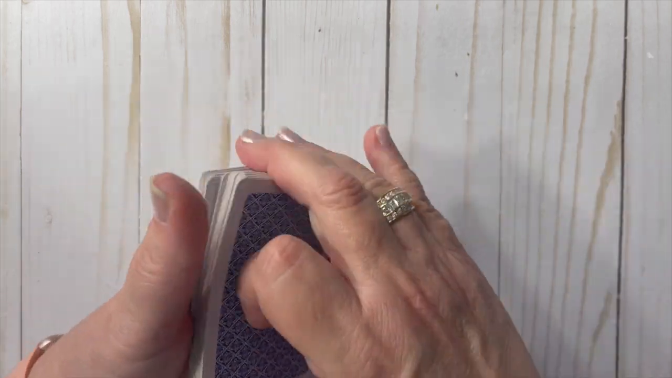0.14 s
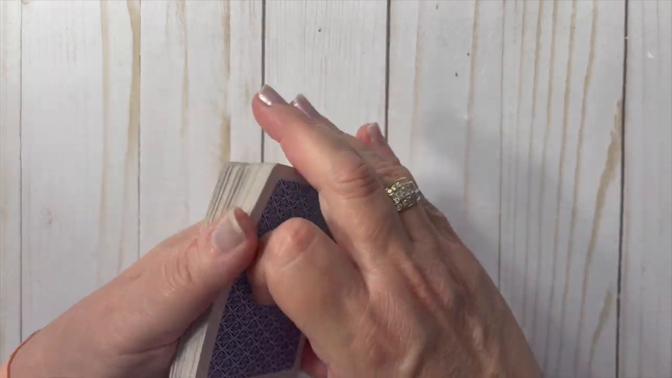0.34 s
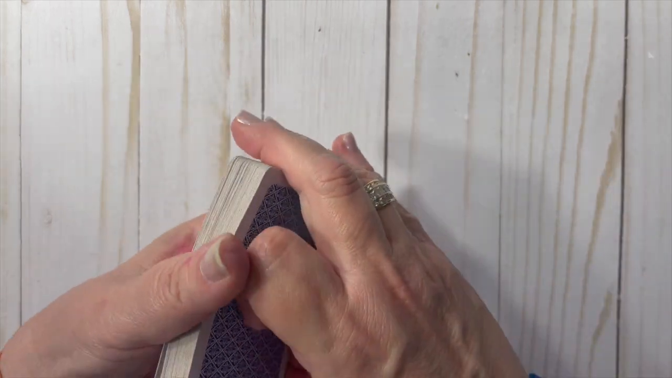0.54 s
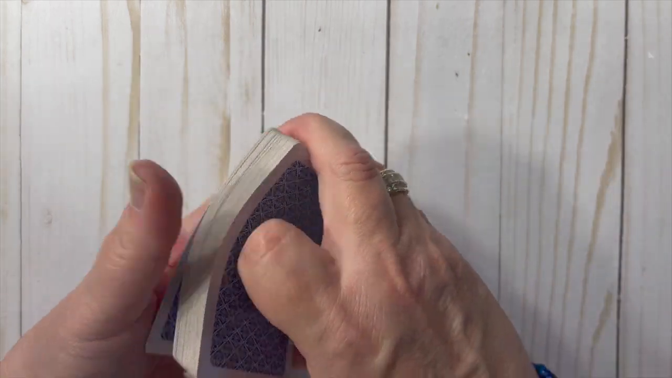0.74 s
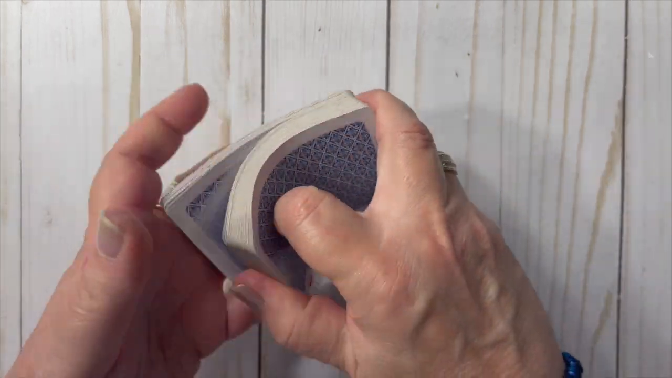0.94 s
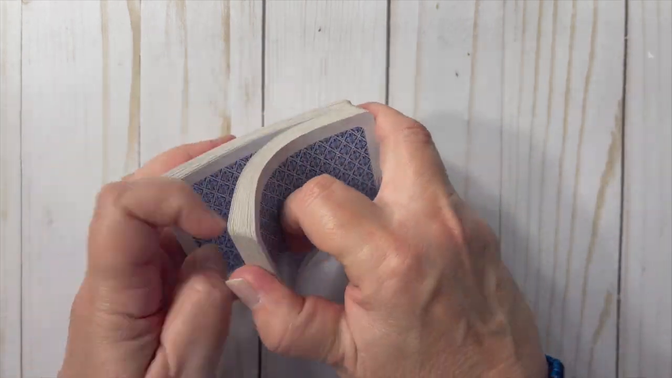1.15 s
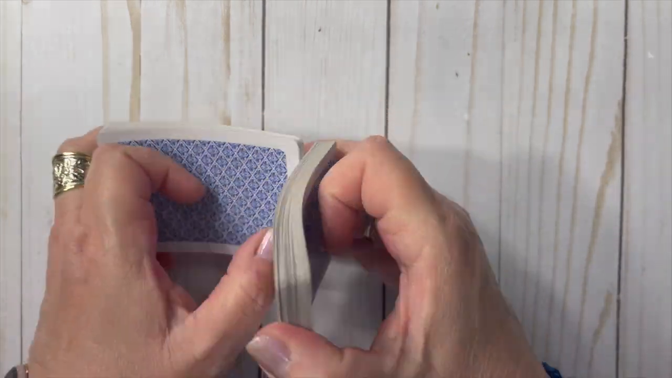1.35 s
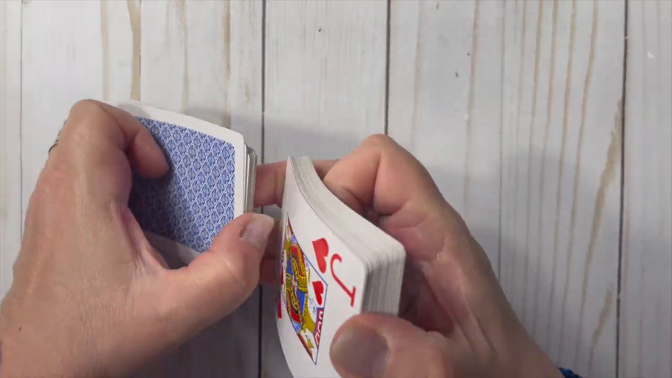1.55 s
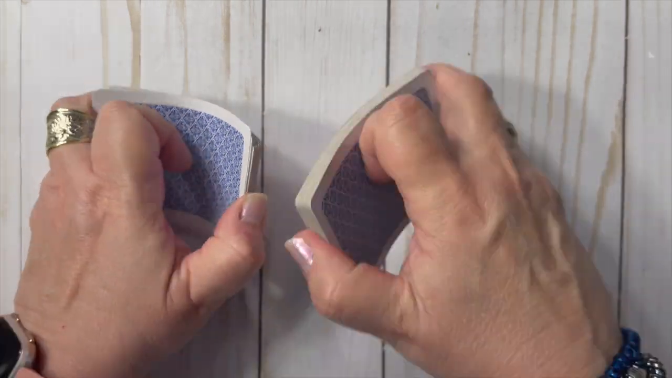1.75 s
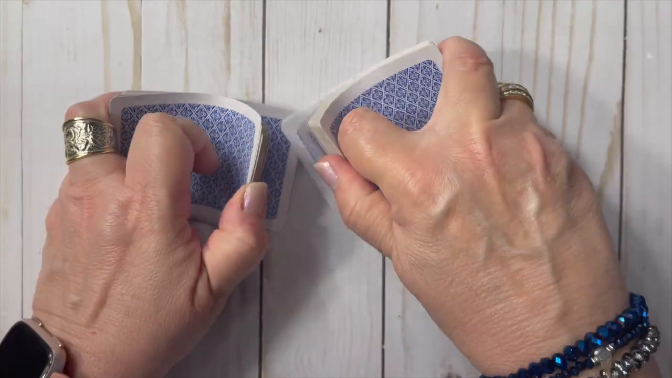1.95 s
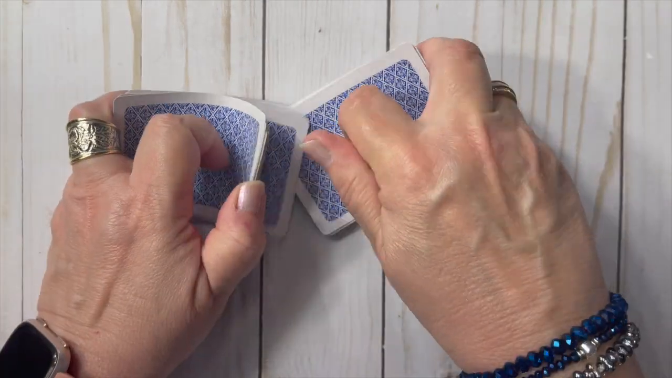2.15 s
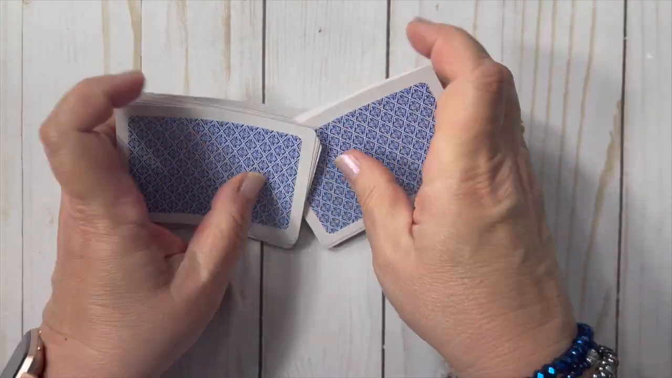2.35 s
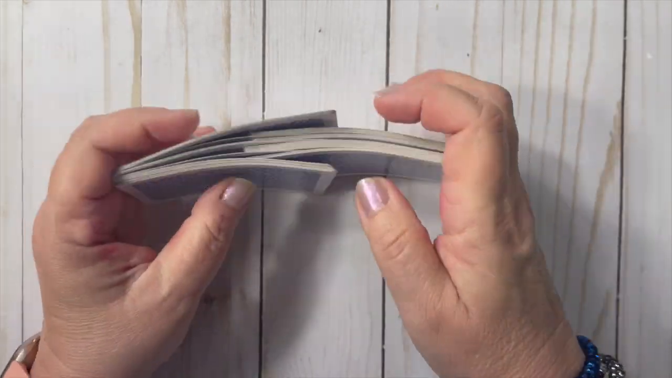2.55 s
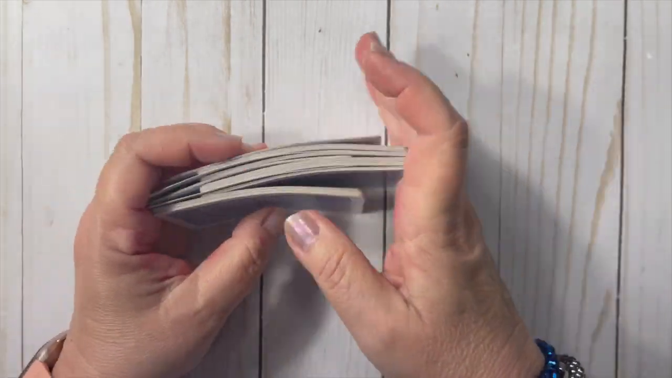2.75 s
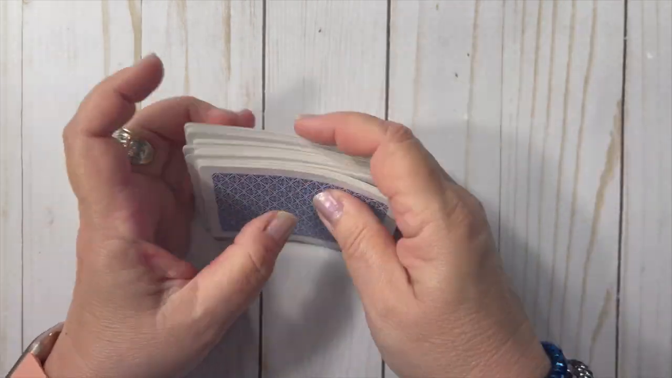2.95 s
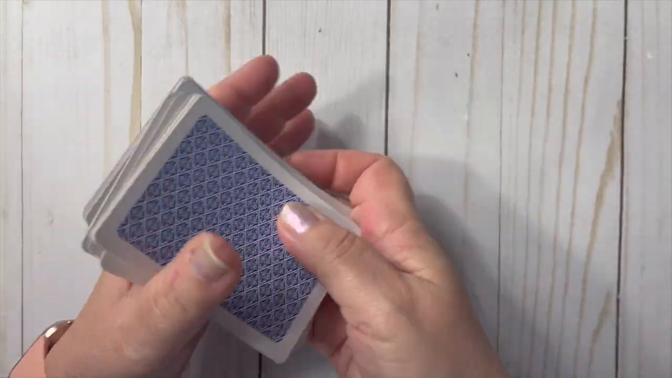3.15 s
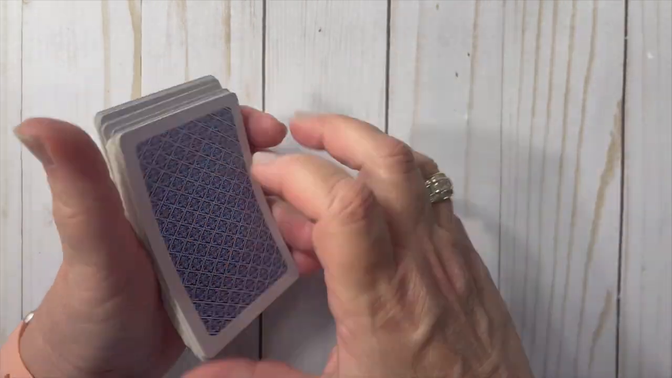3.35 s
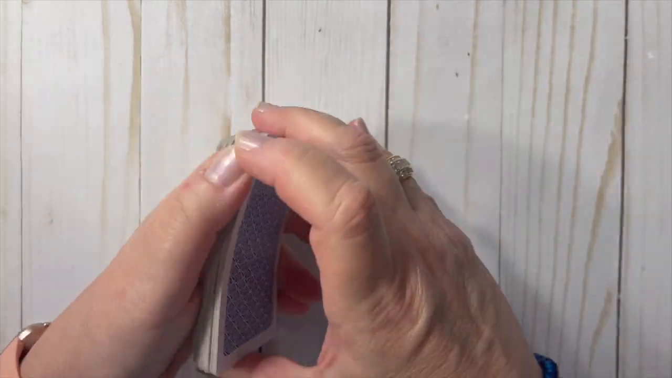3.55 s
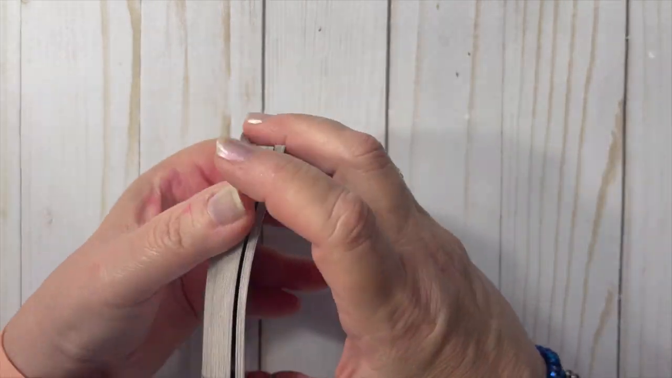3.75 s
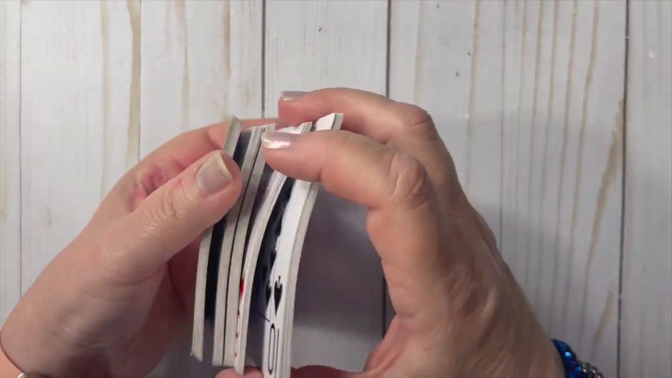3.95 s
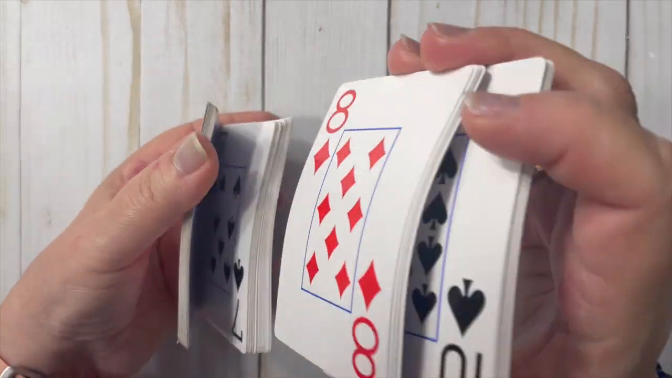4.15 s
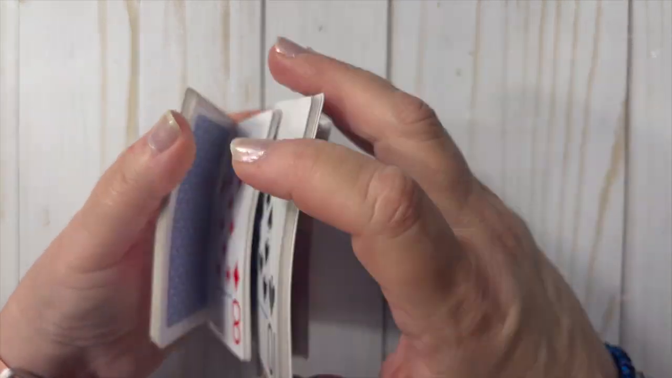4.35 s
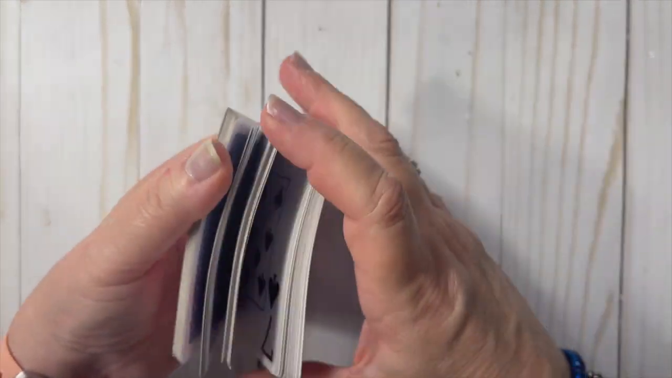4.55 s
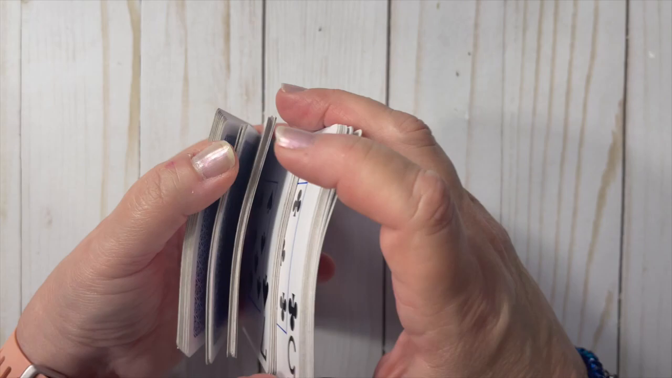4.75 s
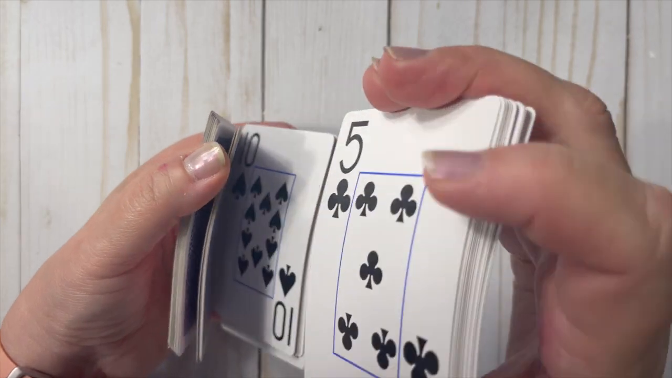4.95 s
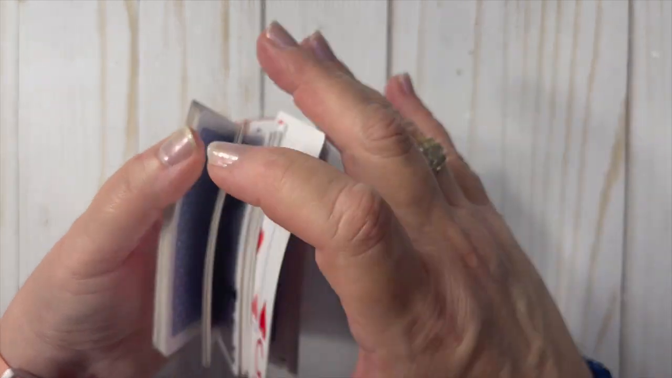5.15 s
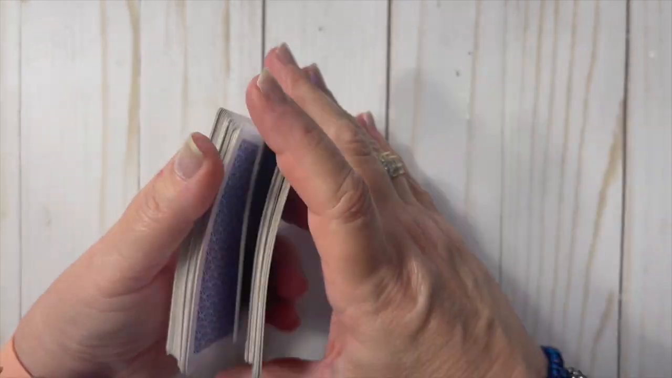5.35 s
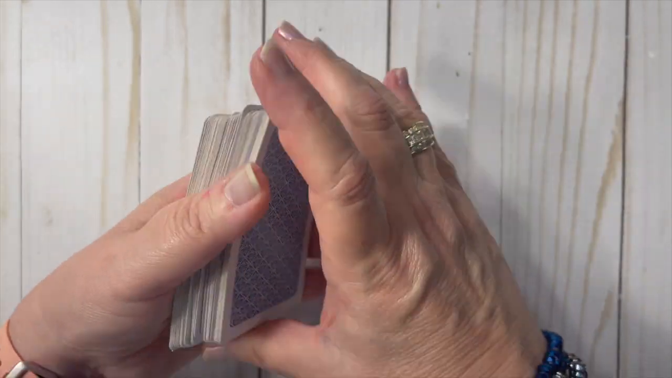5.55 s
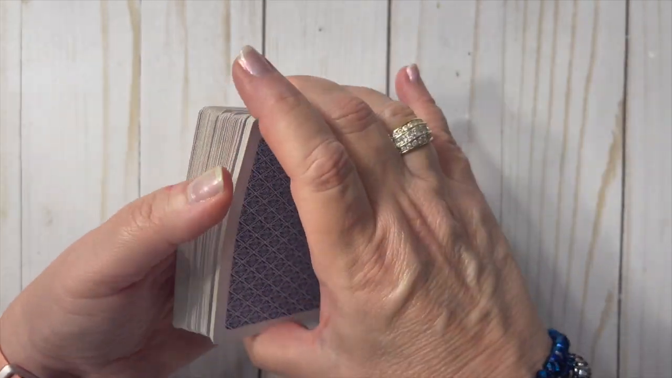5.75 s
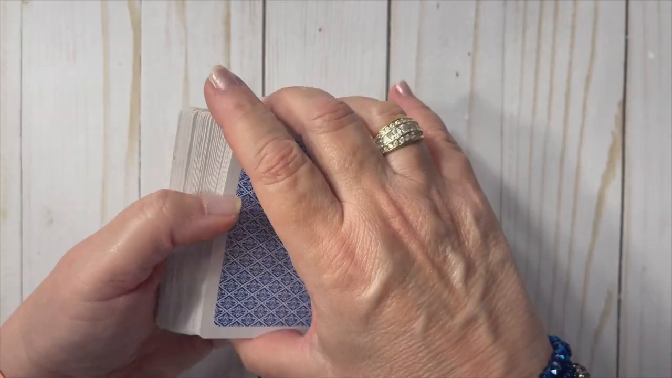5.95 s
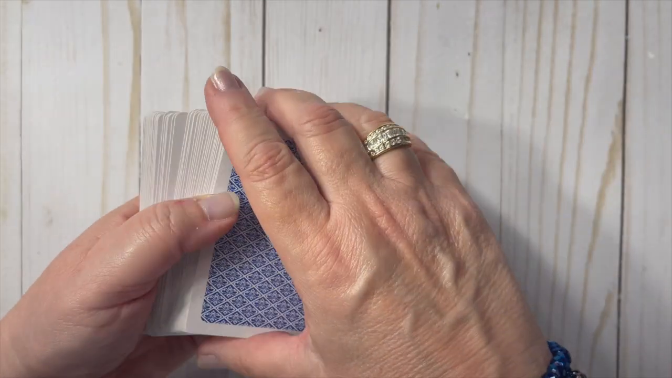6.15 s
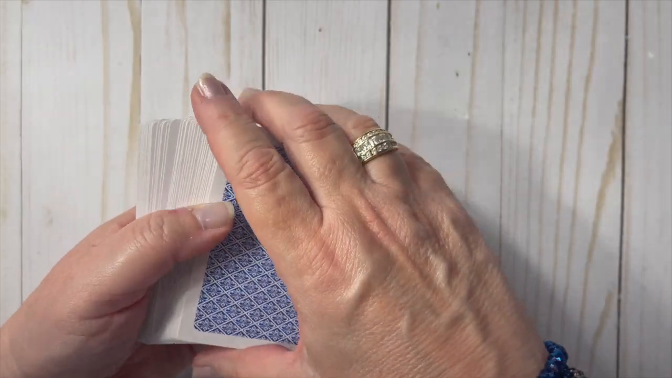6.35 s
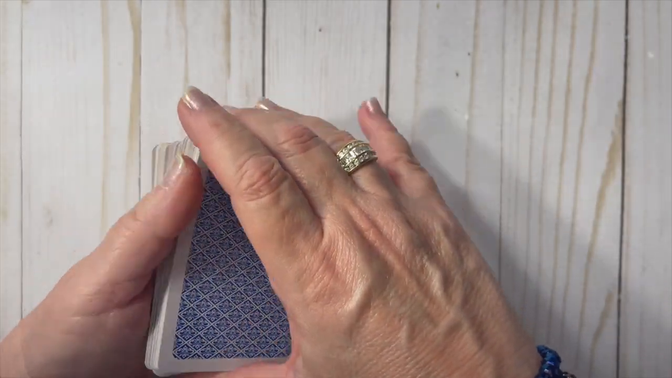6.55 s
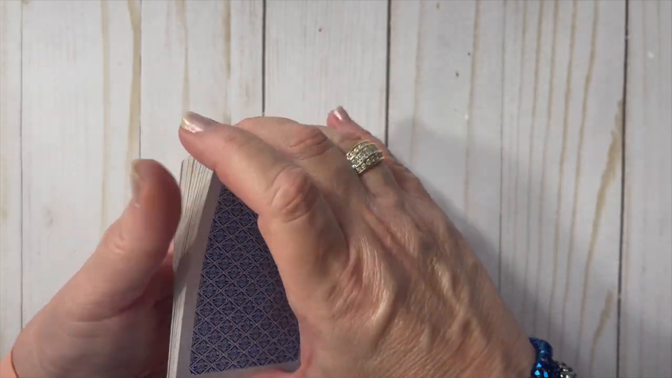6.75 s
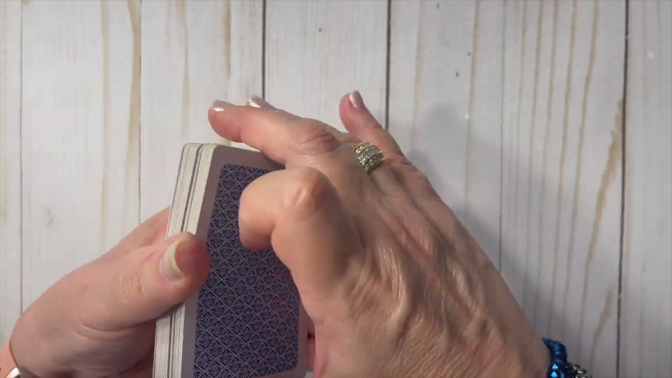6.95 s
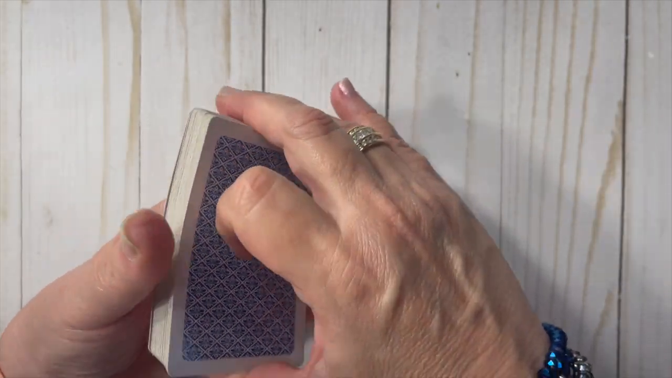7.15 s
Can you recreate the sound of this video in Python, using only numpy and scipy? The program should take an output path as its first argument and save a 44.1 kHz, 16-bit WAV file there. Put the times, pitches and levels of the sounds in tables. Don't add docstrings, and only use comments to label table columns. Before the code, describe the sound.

Crisp card shuffle: faint handling, a rapid rising riffle, loud snaps and a hollow knock, then two sharp cuts and soft finger rustles.

```python
import sys
import numpy as np
from scipy import signal
from scipy.fft import rfft, irfft, next_fast_len
from scipy.io import wavfile
from scipy.ndimage import uniform_filter1d

SR = 44100
rng = np.random.default_rng(int(sys.argv[2]) if len(sys.argv) > 2 else 0)


def gain_from_db(level_db):
    decades = np.asarray(level_db, float) / 20
    return 10 ** decades


def wav_out(sig):
    wavfile.write(sys.argv[1], SR, np.round(np.clip(np.atleast_2d(sig).T, -1, 1) * 32767).astype(np.int16))


N = 317961

# frequency_hz, level_db
EDGE_SPECTRUM = [(1000, -55), (3000, -15.5), (5000, -8.5), (7000, -8.5), (9000, -5.5), (10800, -1),
                 (11800, -9), (13000, -19.5), (14500, -28), (16500, -49.5)]
# frequency_hz, level_db
SLAP_SPECTRUM = [(200, -24.5), (500, -5), (1000, -2), (3000, -6.5), (5000, -7), (8000, -22), (12000, -33.5),
                 (16000, -66.5)]


def evened(x):
    return x / np.sqrt(np.mean(x ** 2) + 1e-20)


def read(points, hz):
    f, value = np.transpose(points)
    return np.interp(np.log(hz + 1), np.log(f + 1), value)


def add(mix, s, sound):
    part = mix[round(s * SR):][:len(sound)]
    part += sound[:len(part)]


def colour(x, points):
    log_gain = read(points, abs(np.fft.fftfreq(2048, 1 / SR))) * np.log(10) / 20
    taps = np.fft.ifft(np.exp(np.conj(signal.hilbert(log_gain)))).real[:1024]
    return signal.oaconvolve(x, taps / np.linalg.norm(taps))[:len(x)]


def resonate(x, hz, width):
    r = np.exp(-np.pi * width / SR)
    turn = 2 * np.pi * hz / SR
    gain = np.sqrt(2 * (1 - r * r)) * np.sin(turn)
    return signal.lfilter([gain], [1, -2 * r * np.cos(turn), r * r], x)


def ringing(x, hz, width):
    return evened(resonate(resonate(x, hz, width), hz, width))


def grit(shape, size, depth_db):
    return evened(gain_from_db(depth_db * evened(uniform_filter1d(rng.standard_normal(shape), size))))


def burst(noise, shape, db):
    x = noise * shape
    return gain_from_db(db) * x / np.sqrt(np.max(uniform_filter1d(x ** 2, size=110)))


def background():
    # frequency_hz, level_db
    rumble_spectrum = [(12, -50.5), (26, -25), (40, -6), (75, 1.5), (103, -10), (155, -5), (174, -18.5),
                       (215, -23.5), (307, -31), (344, -33), (426, -52), (600, -58.5), (780, -83.5),
                       (1320, -120)]
    # frequency_hz, width_hz, level_db
    machines = [(69.6, 8.56, -64), (152, 6, -70.5)]
    # frequency_hz, level_db
    floor_spectrum = [(300, -1), (900, -13), (1800, -11), (3100, -9.5), (3800, -2.5), (4600, -12),
                      (11000, -21), (13000, -25.5), (16000, -29)]
    noise = rng.standard_normal((6, N))
    hz = np.fft.rfftfreq(N, 1 / SR)
    low = evened(irfft(rfft(noise[:2]) * gain_from_db(read(rumble_spectrum, hz)), N))
    rumble = gain_from_db(-59) * (low[0] + 0.07 * low[1] * np.array([[1], [-1]]))
    hums = sum(gain_from_db(db) * resonate(n, f, w) for (f, w, db), n in zip(machines, noise[2:4]))
    hiss = gain_from_db(-74.5) * np.array([colour(n, floor_spectrum) for n in noise[4:]])
    return rumble + hums + hiss


def room(x):
    # frequency_hz, t60_s
    decay = [(200, 0.25), (600, 0.25), (1200, 0.099), (4000, 0.11), (12000, 0.0069)]
    taps = np.zeros((2, 16000))
    at = np.arange(20, 15900, 20) + rng.integers(0, 20, (2, 794))
    np.put_along_axis(taps, at, rng.choice([-1., 1.], at.shape), 1)
    taps *= 1 + 6 * np.exp(-np.arange(16000) / (.003 * SR))
    hz, t, z = signal.stft(taps, SR, nperseg=128)
    fading = gain_from_db(-60 * t / read(decay, hz)[:, None])
    tail = signal.istft(z * fading, SR, nperseg=128)[1]
    tail[1] = .5 * tail[0] + .87 * tail[1]
    return signal.fftconvolve(x[None], tail / np.linalg.norm(tail[0]), axes=1)[:, :N]


def thuds():
    # start_s, level_db, pitch_hz, t60_s
    landings = [(0.828, -47, 144, 0.35), (1.389, -52, 304, 0.033), (1.931, -36.5, 129.6, 0.21),
                (2.297, -43, 97, 0.12), (3.191, -46, 226.6, 0.06), (0.955, -36.5, 152, 0.18),
                (1.029, -37.5, 85, 0.12), (1.266, -51.5, 281, 0.068), (1.801, -41, 209, 0.35),
                (2.091, -24, 104.9, 0.03), (2.163, -34, 200, 0.024), (2.529, -28, 87.1, 0.18),
                (2.876, -44, 249, 0.19), (4.327, -33.5, 332.5, 0.062), (5.115, -44, 434, 0.06)]
    out, t = np.zeros(N), np.arange(8000) / SR
    for (s, db, hz, t60), puff in zip(landings, rng.standard_normal((len(landings), len(t)))):
        push = np.sin(2 * np.pi * hz * t) + .7 * ringing(puff, 2.4 * hz, 1.8 * hz)
        envelope = gain_from_db(db - 60 * t / t60) * (1 - np.exp(-t / .005))
        add(out, s, envelope * push)
    return signal.lfilter(*signal.butter(2, 45, "high", fs=SR), out)


def strokes(column):
    # peak_s, rubbing_db, edge_hiss_db, rise_s, fall_s
    gripping = [(.001, -78, -57.5, .01, 0.012), (0.119, -69.5, -56, 0.086, 0.057),
                (0.241, -62, -56, 0.013, 0.086), (0.326, -61, -58, 0.015, 0.2),
                (0.433, -49, -58, 0.0084, 0.011), (.641, -71, -62, 0.043, 0.41),
                (0.723, -60.5, -53, 0.04, 0.2), (0.825, -36, -37.5, 0.017, 0.01),
                (.86, -44.5, -50, 0.023, 0.026), (.95, -45, -44, 0.13, 0.051),
                (1.028, -61, -59, 0.14, 0.092), (1.162, -57, -60, 0.023, 0.19),
                (1.325, -62, -55.5, 0.25, 0.13), (1.596, -74.5, -65, 0.08, 0.094),
                (1.722, -60, -42.5, .013, 0.026)]
    # peak_s, rubbing_db, edge_hiss_db, rise_s, fall_s
    pushing = [(1.802, -31.5, -40, 0.006, 0.022), (1.823, -30, -43, 0.012, 0.02),
               (1.879, -38, -45, 0.007, 0.046), (1.95, -34, -38, 0.12, 0.22),
               (2.093, -14, -19, 0.026, 0.053), (2.19, -42, -56, 0.16, 0.097),
               (2.368, -60.5, -49, 0.33, 0.27), (2.533, -28, -48, 0.014, 0.094),
               (2.63, -45.5, -64, 0.092, 0.072), (2.752, -43.5, -41, 0.17, 0.046),
               (2.875, -39, -43.5, 0.05, 0.058), (2.949, -64, -75.5, 0.064, 0.15),
               (3.115, -56, -50, 0.088, 0.22), (3.299, -73.5, -60.5, 0.28, 0.47),
               (3.522, -70.5, -60.5, 0.39, 0.26), (3.65, -70, -79, 0.35, .15),
               (3.76, -69, -59, 0.083, 0.26), (4.019, -77, -67.5, 0.13, 0.86)]
    # peak_s, rubbing_db, edge_hiss_db, rise_s, fall_s
    cutting = [(4.332, -36.5, -36, 0.013, 0.026), (4.375, -55.5, -51, 0.087, 0.094),
               (4.59, -66.5, -56, 0.1, 0.2), (4.69, -70.5, -56.5, 0.16, 0.21),
               (4.84, -70.5, -64, 0.25, 0.016), (5.119, -49, -35.5, 0.03, 0.013),
               (5.164, -54.5, -53, 0.036, 0.031), (5.211, -65, -47.5, 0.023, 0.039),
               (5.31, -67.5, -58, 0.064, 0.15), (5.367, -53.5, -46.5, 0.037, 0.038),
               (5.485, -60, -56.5, 0.073, 0.085), (5.557, -65.5, -61.5, 0.043, 0.28),
               (5.804, -68, -61.5, 0.099, 0.14), (5.964, -67.5, -67.5, 0.068, 0.048),
               (6.124, -65.5, -64.5, 0.22, 0.064), (6.36, -63.5, -59.5, 0.12, 0.081),
               (6.46, -64, -58.5, 0.053, 0.11), (6.564, -67.5, -60, 0.043, 0.03),
               (6.643, -62.5, -59.5, 0.064, 0.087), (6.77, -66, -69, 0.027, 0.025),
               (6.85, -65, -58, 0.14, 0.11), (7.05, -63.5, -51.5, 0.029, 0.053),
               (7.2, -73, -62, 0.042, 0.045)]
    rows = np.array(gripping + pushing + cutting)
    t = np.arange(0, N + 44, 44)[:, None] / SR
    peak, rise, fall = rows[:, 0], rows[:, 3], rows[:, 4]
    away = np.where(t < peak, (peak - t) / rise, (t - peak) / fall)
    roundness = 1.1
    power = (gain_from_db(rows[:, column] - 20 * away ** roundness) ** 2).sum(1)
    return np.interp(np.arange(N) / SR, t[:, 0], 10 * np.log10(power + 1e-14))


def hollow():
    # frequency_hz, width_hz, level_db
    gap_modes = [(667, 160, -1.5), (1270, 120, -8.5), (1820, 88, -7), (3207, 900, -5.5)]
    # time_s, level_over_rubbing_db
    closing = [
        (2.5, -7),
        (2.6, -3),
        (2.74, 0),
        (2.8, 4),
        (2.87, 2),
        (3.03, -10),
    ]
    drive = rng.standard_normal(N) * grit(N, size=500, depth_db=2.)
    t = np.arange(N) / SR
    together = (t > closing[0][0]) & (t < closing[-1][0])
    level_db = np.minimum(strokes(column=1), -27) + np.interp(t, *np.transpose(closing))
    return together * gain_from_db(level_db) * sum(gain_from_db(db) * resonate(drive, hz, w) for hz, w, db in gap_modes)


def catches():
    # start_s, level_db
    catch_events = [(2.533, -16), (2.543, -21.5), (2.569, -35.5), (2.592, -37.5), (2.606, -47.5),
                    (2.632, -40), (2.657, -43), (2.69, -48.5), (2.713, -38.5), (2.731, -44), (2.748, -35),
                    (2.78, -29.5), (2.819, -42), (2.834, -60), (2.849, -26.5), (2.876, -19), (2.893, -32)]
    gap_hz, t60_s, rise_s = 635.5, .038, .002
    out, t = np.zeros(N), np.arange(4000) / SR
    for (s, db), (detune, phase) in zip(catch_events, rng.random((len(catch_events), 2))):
        turn = 2 * np.pi * gap_hz * (1 + 0.02 * (detune - .5)) * t
        tone = np.sin(turn) + 0.21 * np.sin(2.4 * turn + 2 * np.pi * phase)
        add(out, s, gain_from_db(db - 60 * t / t60_s) * (1 - np.exp(-t / rise_s)) * tone)
    return out


def drags():
    # middle_s, level_db, pitch_hz, length_s
    drag_events = [(0.451, -71.5, 650, .04), (0.657, -78, 650, 0.073), (0.659, -67.5, 1930, 0.1),
                   (0.777, -58, 2000, 0.071), (0.852, -51, 4330, 0.039), (0.946, -52.5, 2940, 0.073),
                   (1.176, -63, 3320, 0.084), (1.222, -61, 3920, 0.09), (1.388, -64.5, 636, 0.033),
                   (2.234, -56.5, 630, 0.11), (2.328, -70, 708, 0.16), (2.371, -59, 2450, 0.076),
                   (2.491, -68, 620, 0.023), (3.135, -65.5, 640, 0.053), (3.311, -75, 1493, .06),
                   (3.627, -70.5, 1650, 0.051), (3.81, -68, 2910, 0.028), (4.015, -69.5, 2400, 0.043),
                   (3.522, -75.5, 800, 0.02), (1.434, -70, 2430, .12), (4.805, -66, 1900, 0.024),
                   (5.361, -81, 708, .06), (7.06, -78.5, 1400, 0.076)]
    out = np.zeros(N)
    for (s, db, hz, length), noise in zip(drag_events, rng.standard_normal((len(drag_events), 12000))):
        size = min(round(length * 1.6 * SR), len(noise))
        tone = ringing(noise, hz, 0.13 * hz)[:size]
        add(out, s - size / 2 / SR, gain_from_db(db) * np.hanning(size) * tone)
    return out * grit(N, size=200, depth_db=4.0)


def slides():
    # frequency_hz, level_db
    face_spectrum = [(250, -45.5), (600, -27), (950, -14.5), (1550, -12.5), (1900, -5.5), (2600, -8),
                     (6000, -13), (9000, -13.5), (16000, -65.5)]
    # frequency_hz, width_hz
    bending_tones = [(1850, 220), (2500, 360), (3600, 4500)]
    contact = grit(N, size=60, depth_db=0.5) * grit(N, size=500, depth_db=1.5)
    a, b = rng.standard_normal((2, N)) * contact
    rub_db = np.minimum(strokes(column=1), -28)
    pressure = np.clip((rub_db + 57) / 14, 0, 1)
    light = colour(a, face_spectrum)
    tones = sum(grit(N, size=3000, depth_db=6.) * evened(resonate(light, hz, w)) for hz, w in bending_tones)
    face = (1 - .6 * pressure) * (light + .33 * tones) + .65 * pressure * colour(a, SLAP_SPECTRUM)
    edge = colour(b * grit(N, size=25, depth_db=1.5), EDGE_SPECTRUM)
    edge_level = gain_from_db(strokes(column=2)) * grit(N, size=900, depth_db=1.7)
    return gain_from_db(rub_db - 2.08) * face + edge_level * edge


def contacts():
    # start_s, slap_db, tick_over_slap_db, pitch_hz, length_ms
    split = [(0.8214, -44, -5, 2000, 9.1), (0.8288, -35, -7.5, 990, 5.2), (0.8465, -42, 2.5, 4060, 9.1),
             (0.8575, -46, 9.5, 670, 4), (0.8612, -42.5, 6, 2000, 4.7), (0.8735, -37, 3, 3000, 2.8),
             (0.8865, -43, -9, 2200, 3.5), (0.9068, -37.5, 6, 4300, 3.5), (0.9195, -45, 3, 2700, 5.6),
             (0.9225, -30.5, 6, 2660, 1.6), (0.9285, -46, 7.5, 2360, 8.9), (0.9377, -33, 5.5, 2950, 2),
             (0.9439, -36, -4, 2580, 11), (0.9536, -35.5, 0, 820, 5.2), (0.9645, -37.5, -8, 720, 2.8),
             (0.9724, -46.5, 15, 950, 4.2), (0.9815, -39.5, -6, 890, 5), (1.0117, -56, 15.5, 603, 4),
             (1.019, -35.5, 1.5, 4500, 5), (1.0291, -37.5, -7, 870, 5.0)]
    # start_s, slap_db, tick_over_slap_db, pitch_hz, length_ms
    riffle = [(1.7837, -39, 2, 2360, 7), (1.7946, -25, -15, 2930, 5.3), (1.799, -30.5, 2, 768, 6.4),
              (1.8178, -27.5, 1.5, 2070, 8.5), (1.858, -35.5, -2, 2300, 5.3), (1.868, -25, -2.5, 2840, 6.9),
              (1.8833, -36.5, 7.5, 2350, 3.3), (1.893, -35.5, 0, 1910, 5.6), (1.898, -38.5, 4, 2313, 2.8),
              (1.9041, -35, -2, 2430, 8.4), (1.9133, -37, 2.5, 2400, 3.3), (1.919, -30.5, 4, 1044, 1.9),
              (1.927, -37, -11.5, 830, 3.7), (1.9345, -29, 3.5, 3550, 6), (1.943, -32, 7, 589.4, 1.8),
              (1.9513, -24.5, 5, 3400, 2.5), (1.9639, -27.5, 2.5, 2260, 5), (1.9691, -32, 10, 4230, 2.5),
              (1.9757, -34, 1.5, 833, 6.1), (1.9862, -33, 3.5, 983, 2.7), (1.9947, -27.5, 2, 840, 6.2),
              (2.0008, -17, 0, 4357, 3.5), (2.013, -28, 1, 3007, 4.4), (2.0209, -25.5, 3.5, 2500, 4)]
    # start_s, slap_db, tick_over_slap_db, pitch_hz, length_ms
    let_go = [(2.045, -29.5, -4, 1300, 4.2), (2.0521, -29, 2, 900, 5), (2.0595, -36, 6, 6500, 9),
              (2.0657, -30, 8, 6000, 3), (2.069, -13, 0, 2800, 1.8), (2.0736, -25, -.5, 2800, 6),
              (2.0771, -26, 5, 3980, 6), (2.0858, -12.5, -1, 2300, 6), (2.0965, -13.5, -8, 2000, 5),
              (2.1035, -22, 3, 3000, 7), (2.1102, -15.5, -2, 5500, 5), (2.1115, -18, -9, 1200, 4),
              (2.1175, -23, 6, 3000, 9), (2.1246, -20, -3.5, 2220, 3.4), (2.1285, -27, -1, 5400, 5),
              (2.1478, -27.5, -6, 1250, 4.2), (2.1515, -30, 0, 6300, 4), (2.1604, -16.5, -14, 1600, 2.6),
              (2.1635, -31, 3, 3000, 6), (2.1722, -22.5, -7, 1900, 3.6)]
    # start_s, tick_db
    corner_flicks = [(0.0306, -46.5), (0.063, -57.5), (0.0874, -41), (0.2438, -46), (1.769, -45),
                     (3.047, -55), (3.3295, -52), (3.4116, -47.5), (3.4528, -42), (3.5582, -58),
                     (3.6472, -57.5), (1.353, -61.5), (1.371, -54), (1.954, -27), (2.528, -16),
                     (2.538, -28), (2.549, -37), (4.5111, -47.5), (4.6407, -60), (5.2152, -54),
                     (5.6736, -52.5), (4.02, -54.5), (4.855, -65), (5.311, -53), (6.445, -60), (6.675, -52),
                     (7.033, -53)]
    # start_s, slap_db, tick_over_slap_db, pitch_hz, length_ms
    blows = [(2.5216, -17, -18, 1460, 45), (2.5255, -13.5, -21, 2380, 9.8), (2.547, -25.5, -23, 1400, 20),
             (2.527, -9.5, -24, 3400, 16.7), (2.539, -11, -31, 1410, 7.7), (2.567, -35, -16, 3040, 3.4),
             (2.5696, -30, -22, 1920, 24), (2.589, -32.5, -24, 1800, 7.8), (2.6306, -48, -17, 2100, 4.4),
             (2.738, -36, -8, 1890, 2.5), (2.777, -41.5, -21, 1330, 6.6), (2.8763, -28.5, -30, 2000, 7.8),
             (2.846, -40.5, -1, 875, 19), (2.868, -25.5, -25, 867, 18), (3.184, -39.5, -1.5, 2918, 6.2),
             (4.3133, -36.5, 3, 2275, 12), (4.3274, -20, 4, 3040, 2.3), (4.3285, -21.5, -6, 5800, 2.7),
             (5.107, -42, 2.5, 2190, 2.3), (4.3308, -23.5, 0, 2330, 5.5), (4.3748, -36, 1.5, 5700, 10),
             (4.441, -61.5, 7, 4000, 2.5), (5.113, -40.5, 1.5, 2360, 29.3)]
    # start_s, slap_db, tick_over_slap_db, pitch_hz, length_ms
    taps = [(.4235, -47.5, -7.5, 2330, 2.4), (.4285, -51, -2, 1130, 8), (1.1492, -50, -3, 2200, 3.9),
            (1.2092, -42, 1, 3800, 3.5), (1.2105, -46, -6, 1850, 4), (1.218, -47, -6, 1850, 5),
            (1.3, -55, 3, 3000, 4), (2.418, -55, -10, 980, 16), (1.264, -48, 0, 1300, 12),
            (1.268, -46, -8, 2450, 8), (1.3165, -40, 0, 3120, 3), (1.319, -47, 0, 2800, 8),
            (1.3403, -47.5, 6, 3900, 5.4), (1.559, -62, -4, 2400, 1.5), (2.2786, -51, 9.5, 2740, 2.3),
            (3.112, -53.5, 3, 1950, 8), (3.194, -52, -10, 650, 8), (3.082, -56, -5, 1300, 20),
            (3.187, -58.5, 13, 1476, 8.1), (5.166, -55, -1.5, 2290, 7.8), (5.1918, -54, 7, 1994, 1.6),
            (5.4941, -57, 0, 2250, 12), (5.6, -61, -3, 1900, 14), (6.35, -60, -2, 1800, 14),
            (5.8305, -56, -1, 1840, 5), (6.4715, -61, -5, 1300, 7), (6.7623, -58, -5, 1900, 8),
            (5.369, -52, 0, 1800, 5), (6.6472, -56, -12, 2130, 5.6), (6.8095, -53, -7.5, 1887, 7),
            (6.9357, -59, 1, 1774, 5)]
    over_db = 32
    flicks = [(s, db - over_db, over_db, 3000, 3) for s, db in corner_flicks]
    return np.vstack([split, riffle, let_go, flicks, blows, taps])


def snaps():
    landing_hz, landing_s, landing_db = 760, .0025, -14
    snappy_ms = 5
    slap, tick, t = np.zeros(N), np.zeros(N), np.arange(2600) / SR
    rows = contacts()
    roughness = grit((len(rows), 1, len(t)), size=20, depth_db=4.)
    noise = rng.standard_normal((len(rows), 3, len(t))) * roughness
    for (s, db, tick_db, hz, ms), (a, b, c) in zip(rows, noise):
        u = t / (max(ms - .5, 1) * .00027)
        shape = u ** .5 * np.exp(-u) + .035 * (1 - np.exp(-u)) * np.exp(-t / .006)
        force = np.clip((db + 50) / 14, .02, 1)
        face = colour(ringing(a, hz, .22 * hz) + 1.5 * force * a, SLAP_SPECTRUM)
        add(slap, s, burst(face, shape, db))
        flat = ringing(c, landing_hz, 280)
        add(slap, s + landing_s, burst(flat, shape, db + landing_db + 20 * np.log10(force)))
        crack = np.sin(2 * np.pi * hz * t) * np.exp(-t * hz / 3.3)
        add(slap, s, force * min(1, (snappy_ms / ms) ** 2) * burst(crack, 1, db - 6))
        add(tick, s, burst(b, shape, db + tick_db))
    return slap + gain_from_db(0.47) * colour(tick, EDGE_SPECTRUM)


def ports(x):
    # frequency_hz, lead_rad
    lead = [(0, 0), (250, 0), (690, -.7), (1550, .05), (2800, .45), (3900, .75), (4400, 1.7), (5200, 4.5),
            (5850, 6.3), (6550, 6.8), (8700, 9.35), (9400, 9.52), (12300, 12.57), (13500, 12.7)]
    # frequency_hz, difference_db
    tilt = [(250, 1), (650, 4.5), (1300, .5), (3800, -1), (6000, 0), (16000, 0)]
    size = next_fast_len(N)
    hz = np.fft.rfftfreq(size, 1 / SR)
    half = gain_from_db(read(tilt, hz) / 2) * np.exp(.5j * read(lead, hz))
    return irfft(rfft(x, size) * np.array([half, 1 / half]), size)[:, :N]


def scene():
    cards = snaps() + slides() + hollow() + catches() + drags()
    wander = 0.29 * evened(uniform_filter1d(rng.standard_normal(N), size=60))
    spread = cards * np.outer([1, -1], wander) + gain_from_db(-14) * room(cards)
    spread = signal.lfilter(*signal.butter(2, 180, "high", fs=SR), spread)
    return ports(cards + thuds() + spread) + background()


def gapped(x, under_db, busy_db):
    # frequency_hz, level_db
    treble_floor = [(11400, -125), (11900, -100), (13000, -96), (14000, -96), (16000, -88)]
    hz, _, z = signal.stft(np.array([x[0] + x[1], x[0] - x[1]]) / 2, SR, nperseg=1024)
    power = (abs(z[:, :512]) ** 2).reshape(2, 32, 16, -1).mean(2).repeat(16, 1)
    power = uniform_filter1d(power, size=3)
    busy = power[:, 32:].mean((0, 1)) > gain_from_db(2 * busy_db)
    margin_db = np.where(busy, 2 * under_db, under_db)
    hidden = (power < power[::-1] * gain_from_db(-2 * margin_db)) & (hz[:512, None] > 1300)
    quiet_db = np.where(power[0, 240:256].mean(0) < gain_from_db(2 * -99), -20, 0)
    threshold_db = read(treble_floor, hz[:512])[:, None] + quiet_db
    z[:, :512] *= ~(hidden | (power < gain_from_db(2 * threshold_db)))
    mid, side = signal.istft(z, SR, nperseg=1024)[1][:, :N]
    return np.array([mid + side, mid - side])


def roll_off(x):
    return signal.sosfilt(signal.butter(12, 16500, fs=SR, output="sos"), x)


def record(dry):
    ceiling = dry / (1 + (dry / .82) ** 4) ** .25
    limited = signal.oaconvolve(ceiling, signal.firwin(127, 15900, fs=SR)[None], "same")
    finished = gapped(limited, under_db=7.5, busy_db=-73.0)
    return roll_off(finished)


dry = scene()
out = record(dry)
wav_out(out)
```